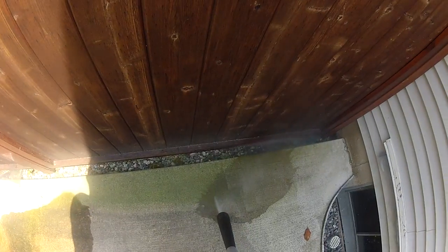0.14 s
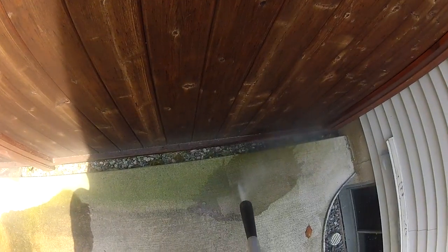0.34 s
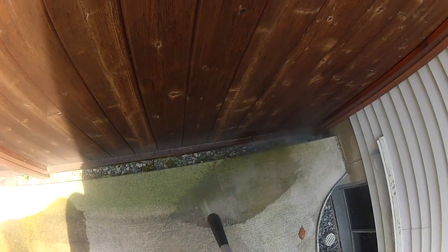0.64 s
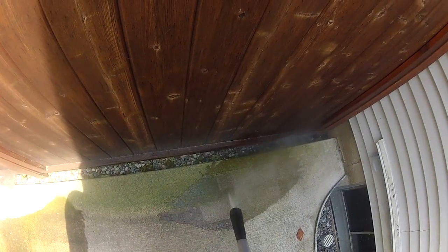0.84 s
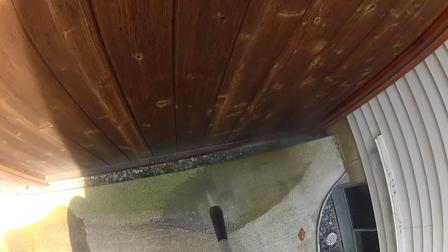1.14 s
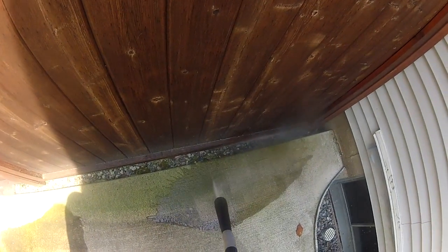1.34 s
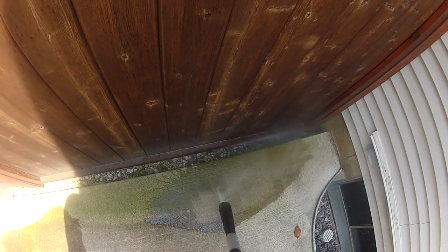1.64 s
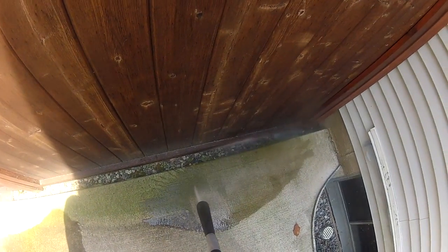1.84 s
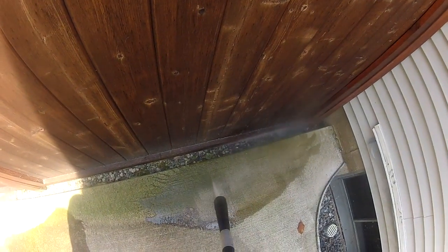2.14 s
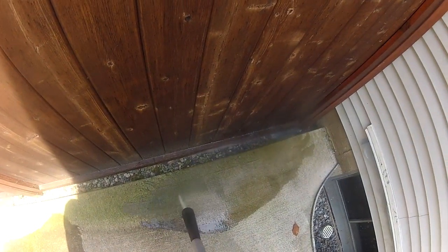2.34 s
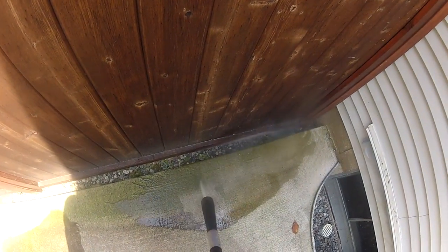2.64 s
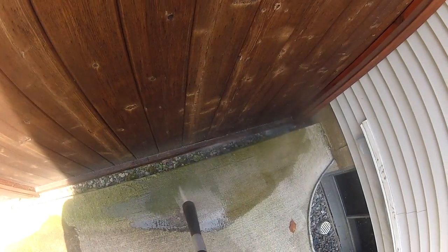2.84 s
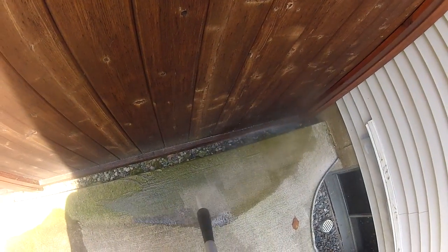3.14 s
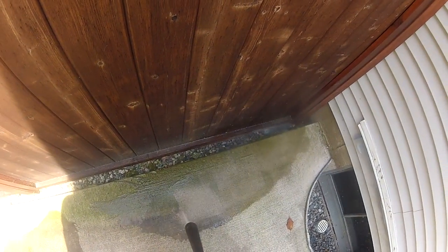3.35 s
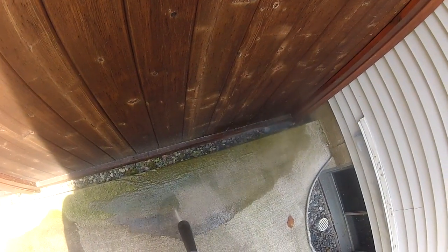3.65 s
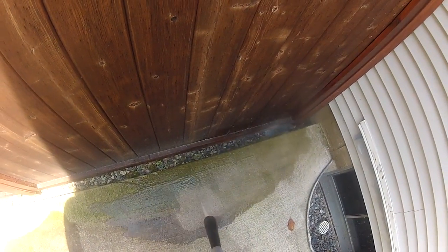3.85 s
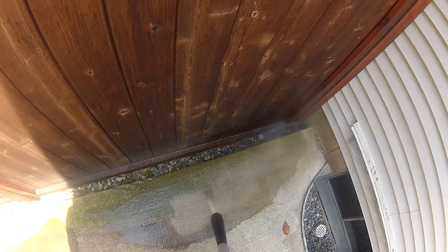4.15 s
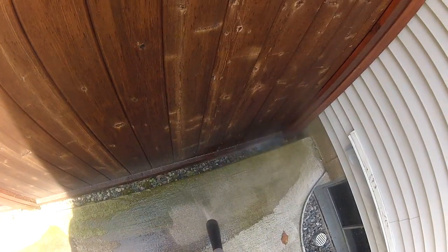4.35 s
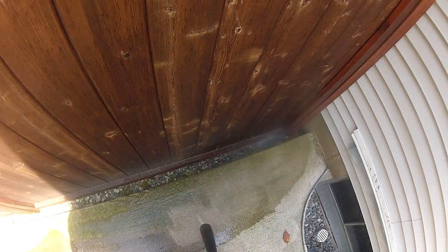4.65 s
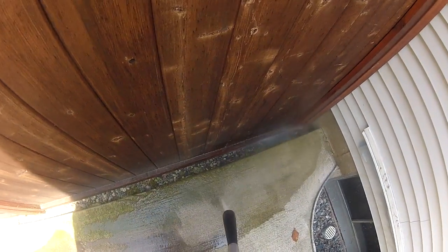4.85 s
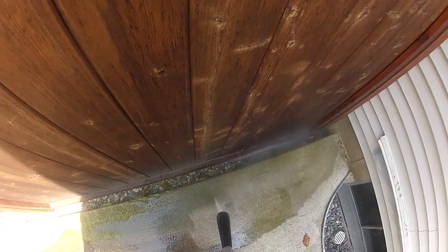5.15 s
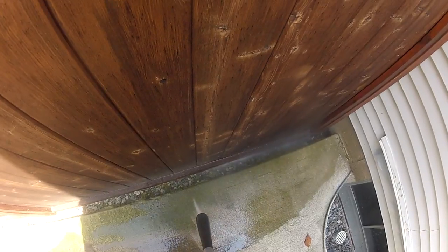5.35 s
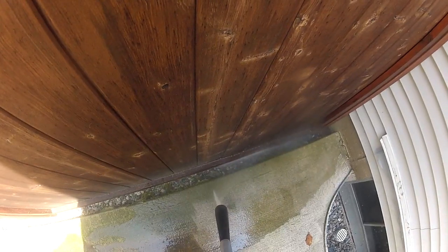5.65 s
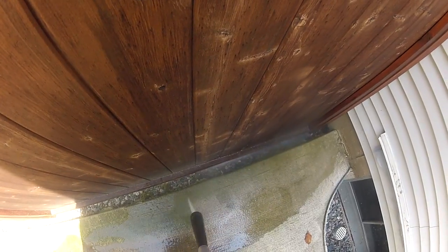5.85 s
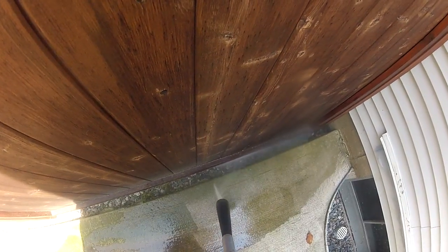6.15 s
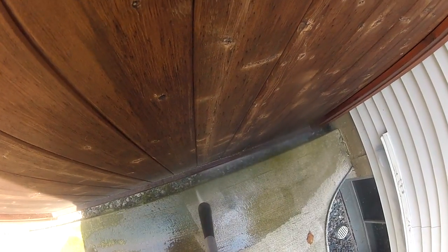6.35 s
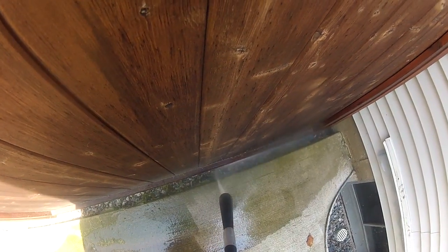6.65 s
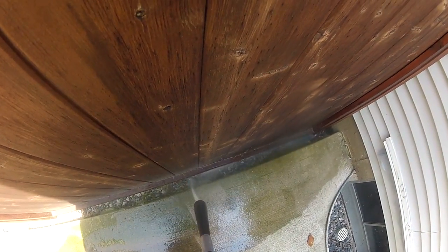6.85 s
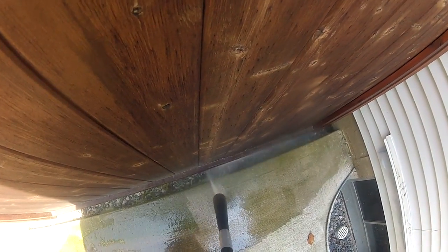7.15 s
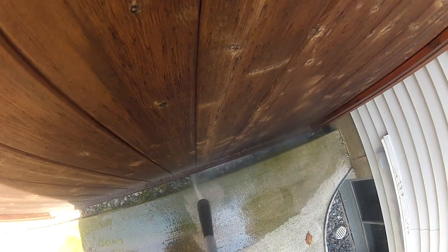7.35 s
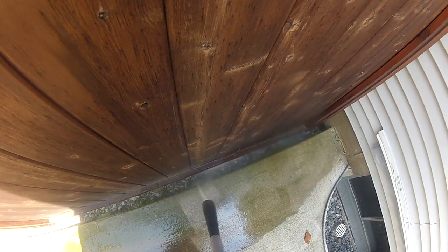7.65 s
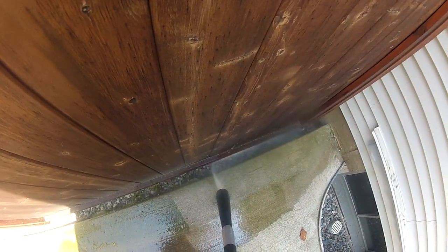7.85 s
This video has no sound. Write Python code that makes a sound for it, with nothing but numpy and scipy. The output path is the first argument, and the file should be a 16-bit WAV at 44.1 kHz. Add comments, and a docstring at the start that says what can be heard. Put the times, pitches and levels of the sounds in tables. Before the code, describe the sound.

Steady hiss of a pressure washer spraying a concrete slab, over the even, rapid chug and buzz of its small engine.

```python
"""A petrol pressure washer runs at a governed speed while its wand sweeps a concrete slab by a wooden wall.
From the start the single cylinder thumps once per four-stroke cycle over fan roar and frame buzz, and
the jet hisses, ringing now and then in a pit. After 4 s the exhaust barks out as the operator moves round.
Near 5 s it opens fully and the wand closes in, so the comb filtering of the hiss shifts upward; around
5.7 s the jet ploughs through standing water. Throughout, a small camera's coarse sampling adds grit."""
import sys
import numpy as np
from scipy import signal
from scipy.fft import rfft, irfft, next_fast_len
from scipy.io import wavfile
from scipy.ndimage import map_coordinates

SR = 44100
rng = np.random.default_rng(int(sys.argv[2]) if len(sys.argv) > 2 else 0)


def transcribe(signal):
    """Save signal, clipped to [-1, 1], as a 16-bit WAV file at the path in sys.argv[1]."""
    frames = np.atleast_2d(signal).T
    limited = np.clip(frames, -1, 1)
    pcm = np.round(limited * 32767).astype(np.int16)
    wavfile.write(sys.argv[1], SR, pcm)


N = 352800
TIME = np.arange(N) / SR
SOUND_M_PER_S = 343


def amp(db):
    """Amplitude ratio of a level in decibels."""
    return 10 ** (np.asarray(db) / 20)


def unit(x):
    """Normalisation to rms 1."""
    return x / np.sqrt(np.mean(x ** 2) + 1e-20)


def curves(rows):
    """Linear interpolation in time of each column after the first."""
    times, *columns = np.transpose(rows)
    return [np.interp(TIME, times, column) for column in columns]


def wobble(knots_per_s):
    """Slow random modulation: a spline through Gaussian knots."""
    knots = rng.standard_normal(int(N * knots_per_s / SR) + 4)
    return map_coordinates(knots, [TIME * knots_per_s])


def filtered(x, response):
    """Linear filtering: the spectrum times a frequency response."""
    size = next_fast_len(N + 8192)
    return irfft(rfft(x, size) * response(np.fft.rfftfreq(size, 1 / SR)), size)[:N]


def noise(spectrum):
    """Spectral shaping of white noise by (f/Hz, level/dB) points, at rms 1."""
    f, db = np.transpose(spectrum)
    white = rng.standard_normal(N)
    return unit(filtered(white, lambda hz: amp(np.interp(np.log(hz + 1), np.log(f), db, right=-120))))


def ring(centre_hz, half_width_hz):
    """Resonance driven by turbulence: a narrow band of noise."""
    white = rng.standard_normal(N)
    return unit(filtered(white, lambda hz: 1 / (1 + ((hz - centre_hz) / half_width_hz) ** 2)))


def delayed(x, seconds):
    """Propagation delay, which may vary in time."""
    return map_coordinates(x, [np.arange(N) - SR * seconds])


def swell(middle_s, length_s):
    """Smooth envelope of peak 1 and half-power duration length_s."""
    return 1 / np.sqrt(1 + (2 * (TIME - middle_s) / length_s) ** 6)


# Spectrum of the cooling fan and muffler flow: f/Hz, relative level/dB
ROAR_SPECTRUM = [(20, -30), (42, -32), (65, -23), (150, -6), (260, -4.5), (350, 0), (480, 6), (660, 3.5),
                 (760, 4.5), (830, -9), (1030, -6), (1250, -18)]
def fan_roar(cycle, shade_db, fade_db_per_s=0.5):
    """Turbulent flow noise, modulated once per shaft turn, fades as the operator moves on."""
    throb_db = 0.13 * np.cos(4 * np.pi * (cycle - 0.03))
    return amp(-22 - fade_db_per_s * TIME - shade_db + throb_db) * noise(ROAR_SPECTRUM)


INTAKE_ORDERS = 9  # the lowest harmonics belong to the intake, the rest to the frame
# Engine harmonics: multiple of the firing rate, relative level/dB
HARMONICS = [(1, -57), (2, -10.5), (3, -5.5), (4, -4), (5, 1), (6, 0.5), (7, -9.5), (8, -13), (9, -17),
             (10, -10), (11, -5), (12, -8.5), (13, -47)]
def frame_buzz(cycle, shade_db, fade_db_per_s=0.7, dispersion_rad=0.79):
    """Dispersion of bending waves in frame and pump smears the high orders over the whole cycle."""
    level_db = -24 - fade_db_per_s * TIME - shade_db + 0.2 * wobble(10)
    buzz = sum(amp(db) * np.cos(2 * np.pi * k * cycle - dispersion_rad * k * k + 0.12 * wobble(3.26))
               for k, db in HARMONICS[INTAKE_ORDERS:])
    return amp(level_db) * unit(buzz)


# Intake thump at the listener: t/s, level/dB
THUMP_LEVEL = [(0, -17), (1.7, -17), (3.3, -16), (3.7, -14.6), (4.5, -15.8), (4.6, -17.8), (4.8, -14.8),
               (5.8, -16.5), (6.9, -19.3), (8, -18.3)]
def intake_thump(cycle, gulp_phase=0.416, skew_rad=0.33, thin_db_per_s=0.3):
    """Superposition: the low orders align into one push and pull of air per cycle."""
    thump_db, = curves(THUMP_LEVEL)
    flutter_db = 0.36 + 0.51 * wobble(27)
    thin_db = thin_db_per_s * (TIME - N / SR / 2)  # the deepest bass thins out along the slab
    phase = 2 * np.pi * (cycle - gulp_phase)
    pulses = sum(amp(db - thin_db * (1 - k / INTAKE_ORDERS)) * np.cos(k * phase + skew_rad)
                 for k, db in HARMONICS[:INTAKE_ORDERS])
    return amp(thump_db + flutter_db) * unit(pulses)


def blowdown(age_s, ring_hz, rise_s, sag=0.01):
    """Damped muffler resonance: its pitch sinks as the hot gas expands and cools."""
    envelope = (age_s / rise_s * np.exp(1 - age_s / rise_s)) ** 3
    past_peak_s = age_s - rise_s
    return envelope * np.sin(2 * np.pi * ring_hz * past_peak_s * (1 - sag * past_peak_s / rise_s))


# Exhaust bark at the listener: t/s, level/dB, muffler resonance f/Hz
EXHAUST_BARK = [(0, -26, 478), (1.2, -29.5, 470), (4.08, -27.5, 482), (4.18, -21, 502), (4.5, -21.5, 490),
                (4.58, -27.5, 500), (4.85, -24, 465), (5.13, -16.5, 464), (8, -15.5, 477)]
def exhaust(cycle, firing_hz, rise_s=0.00634, lead_cycles=0.1149, drone_order=14):
    """Impulse excitation: each blowdown rings the muffler, a wall echoes it, and one order drones on."""
    bark_db, ring_hz = curves(EXHAUST_BARK)
    valve_cycle = cycle + lead_cycles
    direct = blowdown(valve_cycle % 1 / firing_hz, ring_hz, rise_s)
    echo = blowdown((valve_cycle - 0.5) % 1 / firing_hz, ring_hz, rise_s)
    barks = amp(bark_db - 0.45 + 0.5 * wobble(27)) * unit(direct + 0.33 * echo)
    drone_db = -22 + 0.55 * (bark_db - bark_db.max())
    drone = np.sin(2 * np.pi * drone_order * (valve_cycle - rise_s * firing_hz))
    return barks + amp(drone_db) * drone


def engine(cycle, firing_hz):
    """Acoustic shadowing: buzz and roar weaken as the exhaust side comes round."""
    bark_db, _ = curves(EXHAUST_BARK)
    shade_db = 0.14 * (bark_db - bark_db.min())
    return (intake_thump(cycle) + frame_buzz(cycle, shade_db)
            + exhaust(cycle, firing_hz) + fan_roar(cycle, shade_db))


def walls(x, near_s=0.0034, far_s=0.0085, reflection=0.2, sway_s=0.00008):
    """Early reflections from two walls add a fine colouring that shifts as the operator sways."""
    near = delayed(x, near_s + sway_s * wobble(1.48))
    far = delayed(x, far_s + sway_s * wobble(1.6))
    return x + reflection * (near + far)


# Pits and joints in the concrete: middle t/s, duration/s, f/Hz, half-width/Hz, level/dB
PIT_RESONANCES = [(1.097, 0.22, 4680, 170, -26), (1.597, 0.2, 4720, 170, -24), (2.9, .25, 4800, 170, -26),
                  (4.3, 0.54, 2150, 150, -25), (4.98, 0.41, 3000, 260, -23.5), (5.92, .2, 3120, 90, -32),
                  (6.95, 1, 2370, 160, -28.5)]
def pits():
    """Cavity resonance: each pit or joint rings while the jet catches it."""
    return sum(amp(db) * swell(middle_s, length_s) * ring(hz, half_width_hz)
               for middle_s, length_s, hz, half_width_hz, db in PIT_RESONANCES)


# Spectrum of the splash: f/Hz, relative level/dB
SPLASH_SPECTRUM = [(700, -4), (1200, 2.5), (2000, -16), (3500, -10), (5200, 5.5), (6000, -17)]
def splash():
    """Broadband impact noise swells as the jet ploughs through standing water."""
    return amp(-24.5) * swell(middle_s=5.74, length_s=1.26) * noise(SPLASH_SPECTRUM)


# Hollow rings of the jet's impact: f/Hz, half-width/Hz, level/dB relative to the hiss
IMPACT_RESONANCES = [(2210, 210, -13.5), (2950, 200, -17), (4754, 180, -13.5)]
def impact(detour_m, swing_db=2):
    """Constructive interference: each ring is fed best when the detour holds whole wavelengths."""
    rings = np.zeros(N)
    for hz, half_width_hz, db in IMPACT_RESONANCES:
        gap_db = swing_db * np.cos(2 * np.pi * hz * detour_m / SOUND_M_PER_S)
        rings += amp(db + gap_db + wobble(7)) * ring(hz, half_width_hz)
    return rings


# Spectrum of the jet on concrete: f/Hz, relative level/dB
JET_SPECTRUM = [(250, -8), (700, -8), (900, -10.5), (1150, -9.5), (1400, -5), (1800, -3.5), (2250, 2),
                (2600, -1), (3200, 2), (3650, -3.5), (4150, -3.5), (4700, 0.5), (5300, -1.5), (6000, -18)]
# The wand nearing the slab: t/s, detour of the reflection/m, hiss level/dB
WAND_PATH = [(0, .172, -16.5), (.95, 0.15, -17.3), (1.3, 0.13, -17), (3.1, 0.13, -17), (3.33, 0.17, -16.5),
             (4.45, 0.17, -17), (4.8, 0.14, -17.5), (5.1, 0.082, -19.5), (5.4, .064, -17),
             (6.1, 0.049, -17), (6.5, 0.037, -18), (7, 0.046, -18.5), (8, 0.039, -17)]
def jet_hiss(treble_hz=3250, near_treble_db=-5, scatter_hz=3700, reflection=0.4):
    """Comb filtering: the hiss interferes with its own delayed reflection from the slab."""
    detour_m, hiss_db = curves(WAND_PATH)
    nearness = detour_m.min() / detour_m
    hiss = noise(JET_SPECTRUM)
    body = filtered(hiss, lambda hz: 1 / (1 + (hz / treble_hz) ** 4))
    # close up, the jet has less room to break into hissing drops
    treble = amp(near_treble_db * nearness ** 2) * (hiss - body)
    direct = body + treble + impact(detour_m)
    # the wet, rough surface scatters the highs out of the reflection
    mirrored = filtered(direct, lambda hz: 1 / (1 + (hz / scatter_hz) ** 4))
    return amp(hiss_db - 0.42) * unit(direct + reflection * delayed(mirrored, detour_m / SOUND_M_PER_S))


def spray(cycle):
    """Amplitude modulation: the pump flutters the hiss each shaft turn, a bit more near the thump."""
    jet = jet_hiss()
    surge_db = 0.19 * np.cos(4 * np.pi * (cycle - 0.02)) + 0.14 * np.cos(2 * np.pi * (cycle - 0.3))
    spatter_db = 0.45 * wobble(9.9) + 0.5 * wobble(150)
    return amp(surge_db + spatter_db) * walls(jet + pits() + splash())


# Firing rate as the governor hunts slightly: t/s, f/Hz
FIRING_RATE = [(0.0, 27.327), (1.0, 27.307), (1.25, 27.215), (2.5, 27.194), (3.25, 27.392), (3.75, 27.119),
               (4.25, 27.283), (5.25, 27.217), (5.5, 27.339), (6.75, 27.24), (8.0, 27.279)]
def scene():
    """Phase locking: one crankshaft, turning twice per cycle, drives both engine and pump."""
    firing_hz, = curves(FIRING_RATE)
    cycle = np.cumsum(firing_hz) / SR
    return (engine(cycle, firing_hz) + spray(cycle))[None]


def record(dry, clock_hz=12000, top_hz=15310):
    """Spectral imaging: a slow sample-and-hold mirrors the sound into a gritty treble."""
    slow = signal.resample(dry[0], N * clock_hz // SR)
    held = signal.resample(np.repeat(slow, 4), N)
    return filtered(held, lambda hz: hz < top_hz)[None]


dry = scene()
out = record(dry)
transcribe(out)
```